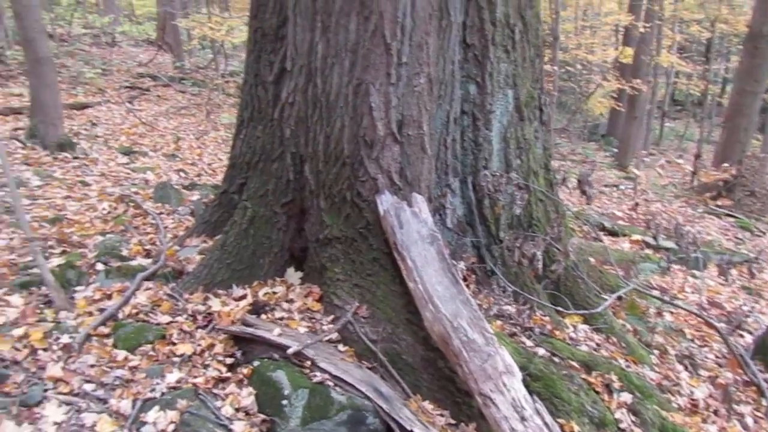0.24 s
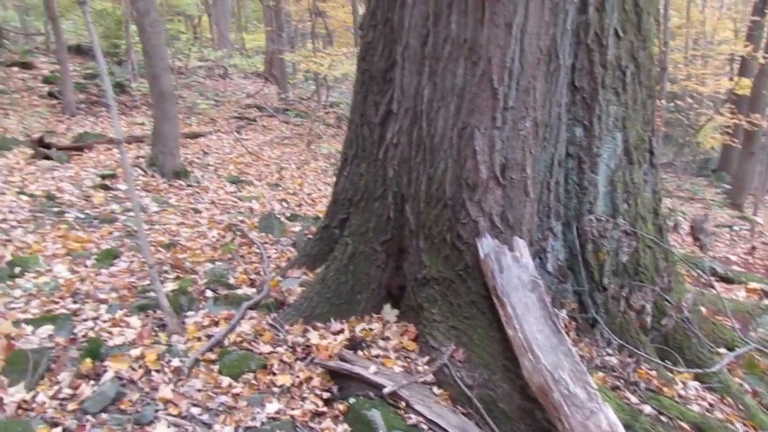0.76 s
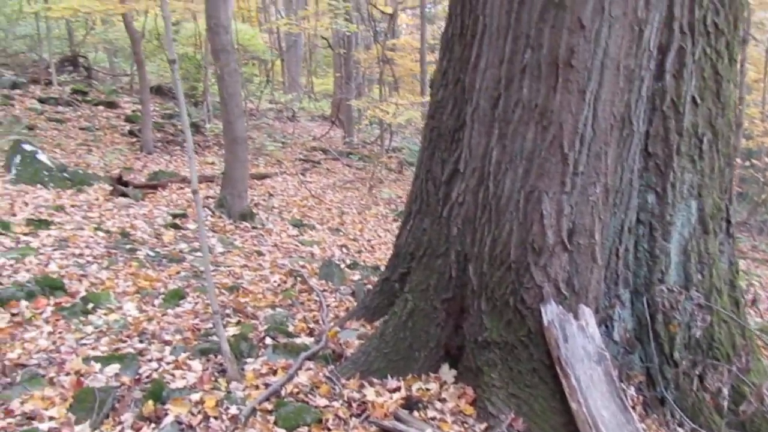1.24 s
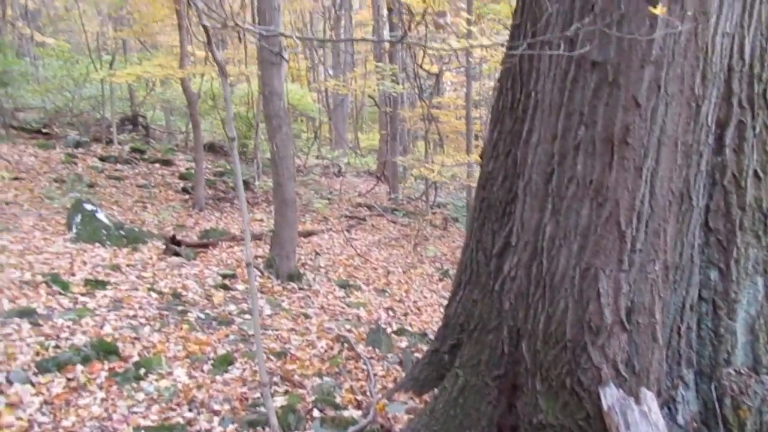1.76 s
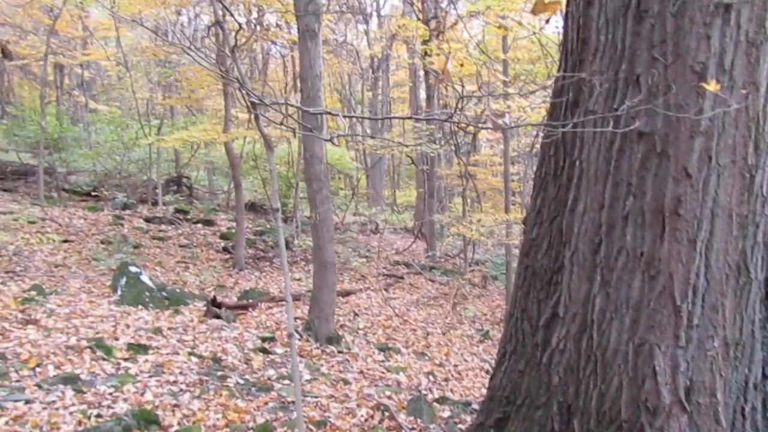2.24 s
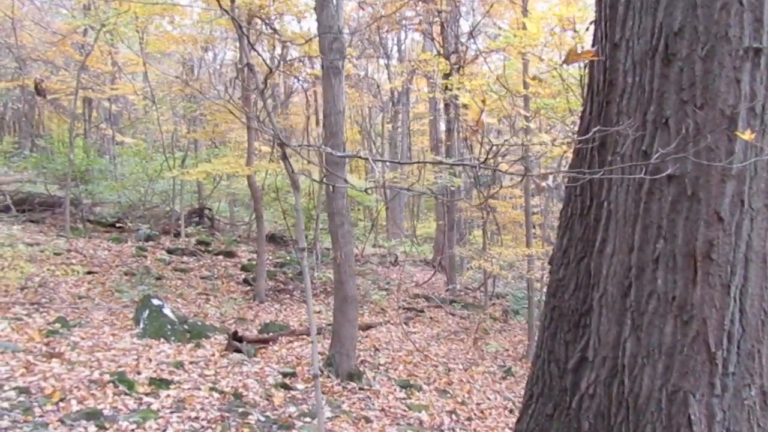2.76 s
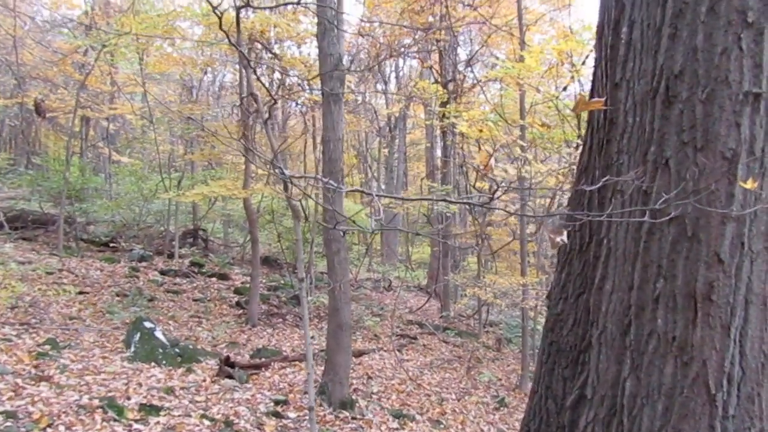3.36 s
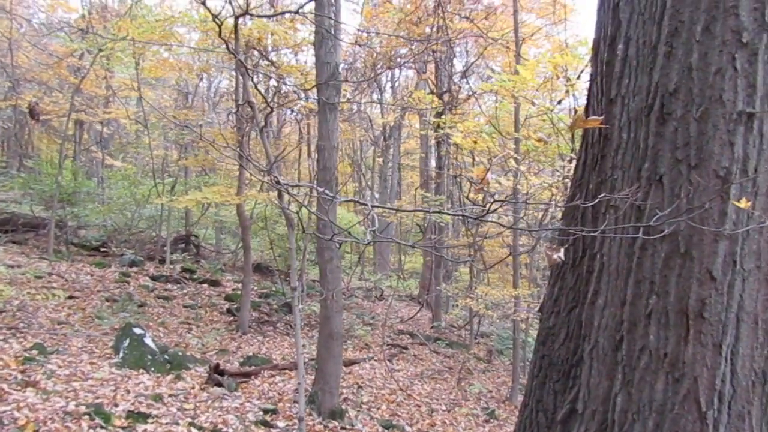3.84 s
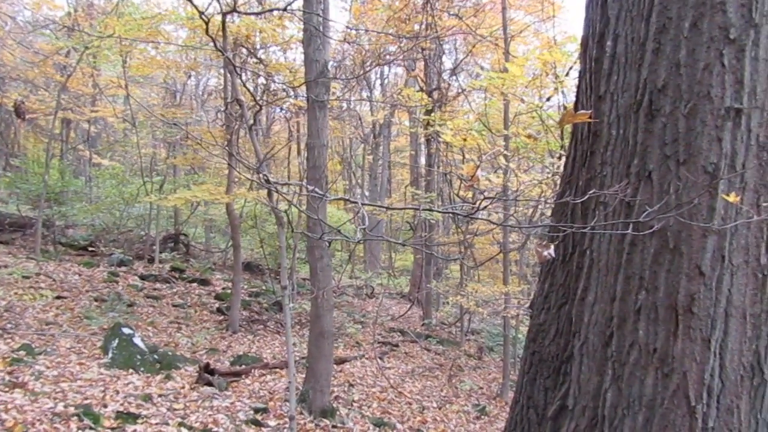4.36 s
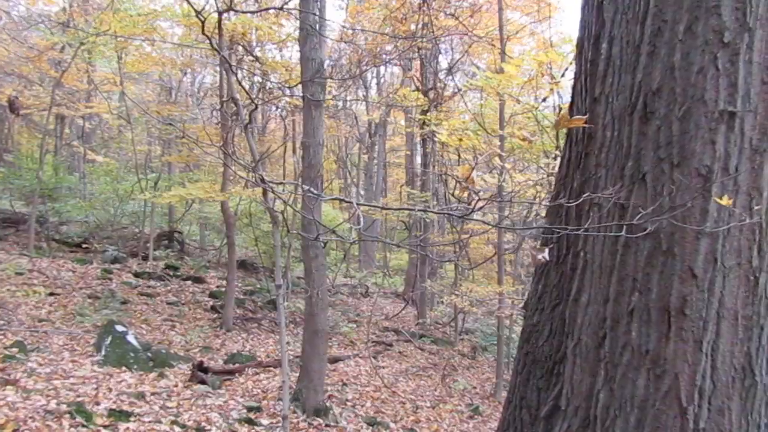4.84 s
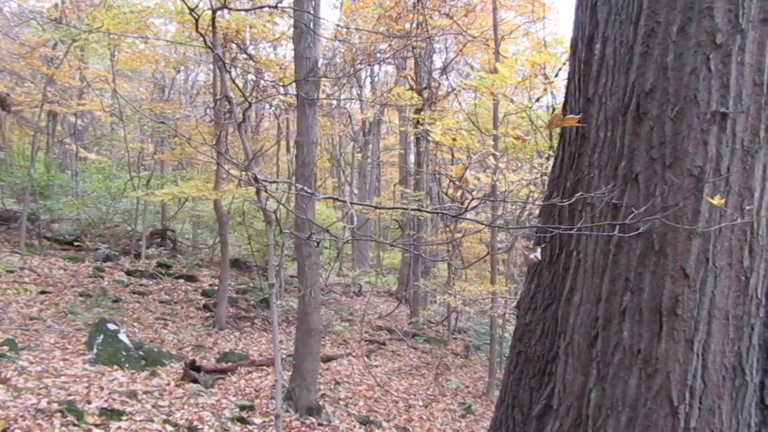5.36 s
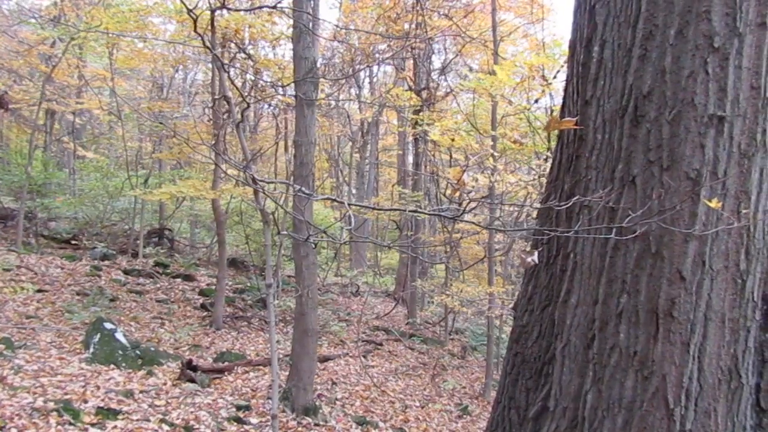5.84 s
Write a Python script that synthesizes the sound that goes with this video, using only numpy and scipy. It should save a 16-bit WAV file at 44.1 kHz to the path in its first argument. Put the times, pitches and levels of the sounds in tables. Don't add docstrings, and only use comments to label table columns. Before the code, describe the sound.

Quiet outdoor air runs throughout: smooth hiss, soft low rumble, a faint distant machine drone around 190 Hz that wavers, and a barely audible thin high electronic whistle. At 0.7 s a tiny, very high bird note is almost hidden. One faint leaf tick comes at 1.9 s. Close dry leaf clicks and small twig knocks cluster at 2.7 and 3.3 s, with lighter ticks at 3.4, 3.9 and 4.1, then denser crackles from 4.3 to 4.65 s. Soft low handling bumps follow from 4.7 s, with a tick at 5.0. At 5.34 s a strong crunch and woody heel thump land; at 5.46 s comes the loudest, sharpest snap, with rustling litter. Smaller snaps occur at 5.7 to 5.9, then a loud crackling break at 6.07 s. Each has a very short woodland echo; the microphone is mono, and its level dips slightly after loud snaps.

```python
import sys
import numpy as np
from scipy import signal
from scipy.fft import rfft, irfft
from scipy.io import wavfile
from scipy.ndimage import uniform_filter1d

SR = 44100
rng = np.random.default_rng(int(sys.argv[2]) if len(sys.argv) > 2 else 0)


def how_loud(loudness_db):
    steps = np.asarray(loudness_db, float) / 20
    return 10 ** steps


def wrap_up_sound(samples):
    columns = np.atleast_2d(samples).T
    tamed = np.clip(columns, -1, 1)
    steps = np.round(tamed * 32767).astype(np.int16)
    wavfile.write(sys.argv[1], SR, steps)


N = 268877

# start_s, peak_db, ring_hz, brittle_db
CRISP_LEAVES = [(1.879, -29, 5660, -10), (2.7103, -21, 2800, -16), (2.7198, -26.5, 6690, 3.5),
                (3.2816, -20, 5600, -9), (3.445, -29, 5000, -7), (3.89, -26, 6160, -6),
                (4.3335, -28, 5000, -12), (4.3614, -21, 4400, -3.5), (4.4035, -25, 5800, -10),
                (4.461, -27, 3560, 0), (4.623, -35, 6000, 3), (4.631, -24, 3460, -10),
                (5.013, -23, 5610, -7), (5.3366, -12.5, 5000, -16), (5.3395, -12, 5800, -9),
                (5.4574, -14, 8000, 0), (5.4708, -30, 5420, -4), (6.071, -26, 4940, -5),
                (6.075, -30, 4390, -8), (6.0774, -19, 4060, -8), (6.0935, -27, 4230, -7)]
# start_s, peak_db, ring_hz, crumble_s
CRUSHED_LITTER = [(2.708, -26, 3750, 0.0024), (2.712, -25.5, 4970, 0.0056), (3.285, -29.5, 6480, 0.0068),
                  (4.125, -27, 3700, .0046), (4.334, -27, 5900, .0072), (4.403, -27, 5860, .0084),
                  (4.642, -31, 6410, .004), (5.3376, -16, 2750, .005), (5.3407, -15.5, 4050, .006),
                  (5.4572, -9.5, 2640, 0.0014), (5.4586, -14.5, 4970, .0045), (5.683, -17, 4760, 0.0025),
                  (5.839, -32, 4130, .002), (5.908, -28.5, 4410, .004), (6.0895, -27, 3740, .001)]
# start_s, peak_db, ring_hz, crumble_s
BREAKING_STALKS = [
    (3.282, -21.5, 5640, 0.002),
    (4.129, -28, 5800, .002),
    (4.6344, -19, 5770, .002),
    (4.635, -29, 3300, 0.0029),
    (5.4576, 1.5, 5250, 0.00023),
    (5.6824, -19.5, 6500, .001),
    (6.0725, -9.5, 4170, 0.0015),
]
# start_s, peak_db, pitch_hz, t60_s (time to fade by 60 dB)
TWIG_KNOCKS = [(2.706, -30.5, 900, .008), (2.7105, -28, 3700, .008), (2.711, -34, 1300, .015),
               (2.7205, -31, 950, .025), (2.722, -35, 1300, .025), (3.2816, -32, 800, .012),
               (3.2817, -24, 3380, .007), (3.282, -30, 1150, .012), (4.3338, -33, 4400, .01),
               (4.361, -30, 1500, .01), (4.362, -35, 500, .012), (4.4043, -29, 3400, .008),
               (4.6347, -26, 3300, .02), (5.338, -30, 760, .022), (5.3398, -18, 6000, .01),
               (5.4562, -20, 2100, .012), (5.4567, -21, 900, .025), (5.4575, -13.5, 2700, .006),
               (5.4576, -16, 2000, .008), (5.4583, -23, 1200, .02), (5.4585, -30, 820, .03),
               (5.462, -26, 1250, .025), (5.4664, -29, 1840, .025), (5.6826, -29, 408, .011),
               (5.6832, -23, 1750, .007), (6.0732, -21.5, 1740, .014), (6.0733, -20, 4400, .008),
               (6.077, -30, 2700, .008)]
# start_s, level_db
HEEL_BLOW = (5.3413, -23)
# pitch_hz, level_db, t60_s
ROOT_MODES = [(194, 0.5, 0.041), (488, 2.5, 0.044), (850, 5.5, 0.02), (1330, 12, 0.0072), (2100, 1, 0.016)]
# start_s, peak_db, t60_s
SETTLING = [
    (3.283, -42, .2),
    (4.127, -43, .18),
    (4.335, -41, 0.64),
    (4.405, -43, .18),
    (4.636, -36, .15),
    (5.341, -29.5, 0.15),
    (5.458, -28.5, 0.081),
    (6.074, -29.5, .07),
]
# start_s, peak_db, t60_s
ROLLING = [
    (2.714, -44, .25),
    (4.465, -47, .25),
    (5.405, -39.5, 0.36),
    (5.43, -42, 0.28),
    (5.53, -42, 0.42),
    (6.092, -44, .3),
]
# middle_s, peak_db, pitch_hz
GRIP_SHIFTS = [(4.72, -41, 190), (4.845, -44, 100), (4.96, -40, 160), (5.09, -50.5, 140), (4.9, -50, 35),
               (4.965, -42.5, 55), (5.095, -41, 40), (5.18, -50, 50), (5.25, -47, 38), (5.335, -44, 35),
               (5.455, -42, 50)]
# pitch_hz, width_hz
MIC_PORT = (4700, 3200)
# start_s, length_s, pitch_hz, level_db
BIRD_NOTE = (.67, .1, 11050, -59)
# pitch_hz, level_db (per Hz)
AIR_COLOUR = [(12, -48), (20, -13), (98, -6.5), (134, -5.5), (187, -4), (328, -9), (367, -8.5), (527, -8.5),
              (607, -7.5), (873, -9), (1710, -12.5), (4060, -10.5), (8180, -16), (11400, -22.5),
              (16000, -41)]
# pitch_hz, width_hz, level_db
HISS_BUMP = (5270, 950, -13.5)
# time_s, level_db
BREEZE = [(0, -1.4), (.9, -.5), (4.9, -.5), (5.3, -1.4), (5.6, -1.4), (6.1, 0.2)]
# pitch_hz, width_hz, level_db
MACHINE = (188.5, 17, -57)
# time_s, level_db
MACHINE_NEARNESS = [(0, -1.5), (2, 3.5), (4, -3), (4.9, 4.5), (5.6, -8), (6.1, -14)]


def rms_one(x):
    return x / np.sqrt(np.mean(x ** 2) + 1e-20)


def peak_one(x):
    return x / np.max(np.abs(x))


def level_over_time(rows):
    time_s, level_db = np.transpose(rows)
    return np.interp(np.arange(N) / SR, time_s, level_db)


def resonate(x, hz, width_hz):
    r = np.exp(-np.pi * width_hz / SR)
    feedback = [1, -2 * r * np.cos(2 * np.pi * hz / SR), r * r]
    return signal.lfilter([(1 - r * r) / 2, 0, (r * r - 1) / 2], feedback, x)


def band(x, low_hz, high_hz):
    edges_hz = [low_hz, min(high_hz, 0.45 * SR)]
    return signal.sosfilt(signal.butter(2, edges_hz, "band", fs=SR, output="sos"), x)


def add(track, start_s, sound):
    at = round(start_s * SR)
    track[at:at + len(sound)] += sound[:N - at]


def one_snap(ring_hz, crumble_s, brittle_db, broad):
    length = 1600
    age = 3.0 * np.arange(length) / SR / crumble_s
    cracks = (rng.random(length) < 0.5) * rng.uniform(-1, 1, length) ** 3
    cracks = cracks * (age + 0.22) * np.exp(-age)

    ring_width_hz = 0.26 * ring_hz
    leaf = resonate(cracks, ring_hz, ring_width_hz)
    leaf = peak_one(resonate(leaf, ring_hz, ring_width_hz))
    port = resonate(cracks, *MIC_PORT) + how_loud(5.0) * cracks
    port = peak_one(band(port, 930, 8400))
    brittle = peak_one(band(band(cracks, 7950, 11900), 6000, 14700))
    return peak_one(leaf + 6.0 * broad * port) + how_loud(brittle_db) * brittle


def snaps():
    out = np.zeros(N)
    for start_s, peak_db, ring_hz, crumble_s in BREAKING_STALKS:
        snap = one_snap(ring_hz, crumble_s, brittle_db=-26, broad=0.2)
        add(out, start_s, how_loud(peak_db) * snap)
    for start_s, peak_db, ring_hz, crumble_s in CRUSHED_LITTER:
        snap = one_snap(ring_hz, crumble_s, brittle_db=-22, broad=0.48)
        add(out, start_s, how_loud(peak_db) * snap)
    for start_s, peak_db, ring_hz, brittle_db in CRISP_LEAVES:
        snap = one_snap(ring_hz, 0.0017, brittle_db, broad=0.48)
        add(out, start_s, how_loud(peak_db) * snap)
    return out


def knocks():
    out = np.zeros(N)
    t = np.arange(SR // 10) / SR
    for start_s, peak_db, hz, t60_s in TWIG_KNOCKS:
        fade = how_loud(-60 * t / t60_s)
        soft_start = 1 - np.exp(-t * hz * 4.2)
        knock = peak_one(fade * soft_start * np.sin(2 * np.pi * hz * t))
        add(out, start_s, how_loud(peak_db) * knock)
    return out


def heel():
    out = np.zeros(N)
    t = np.arange(SR // 4) / SR
    start_s, level_db = HEEL_BLOW
    ring = np.zeros(len(t))
    for hz, mode_db, t60_s in ROOT_MODES:
        ring += how_loud(mode_db - 60 * t / t60_s) * np.sin(2 * np.pi * hz * t)
    add(out, start_s, how_loud(level_db) * band(ring, 110, 6000))
    return out


def woods(near):
    t60_s, level_db, gap_s = 0.09, -45, 0.004
    t = np.arange(SR // 2) / SR
    tail = band(rng.standard_normal(len(t)), 620, 9300)
    tail = tail * how_loud(-60 * t / t60_s) * (t > gap_s)
    return how_loud(level_db) * signal.fftconvolve(near, tail)[:N]


def rustle():
    cracks_per_s = 12000
    sizes = how_loud(2.0 * np.minimum(rng.exponential(1, N), 4)) * rng.choice([-1, 1], N)
    grains = sizes * (rng.random(N) < cracks_per_s / SR)
    through_port = band(resonate(grains, *MIC_PORT), 1400, 14000)
    texture = rms_one(through_port + how_loud(8) * band(grains, 940, 7700))

    t = np.arange(N) / SR
    loudness = np.zeros(N)
    for rows, rise_db_per_s in [(SETTLING, 6000), (ROLLING, 300)]:
        for start_s, peak_db, t60_s in rows:
            rise_db = rise_db_per_s * (start_s - t)
            fade_db = 60 * (t - start_s) / t60_s
            loudness += how_loud(peak_db - np.maximum(rise_db, fade_db))
    return texture * loudness


def handling():
    out = np.zeros(N)
    for middle_s, peak_db, hz in GRIP_SHIFTS:
        cycles = np.arange(round(1.5 * SR / hz)) * hz / SR
        push = np.hanning(len(cycles)) * np.sin(2 * np.pi * cycles)
        add(out, middle_s - 0.73 / hz, how_loud(peak_db) * push)
    return out


def chirp():
    out = np.zeros(N)
    start_s, length_s, hz, level_db = BIRD_NOTE
    t = np.arange(round(length_s * SR)) / SR
    swell = np.sin(np.pi * t / length_s)
    waver = 3 * np.sin(2 * np.pi * 14 * t)
    add(out, start_s, how_loud(level_db) * swell * np.sin(2 * np.pi * hz * t + waver))
    return out


def whistle():
    hz, level_db = 11794, -70
    wander = 0.02 * np.cumsum(rng.standard_normal(N))
    tone = np.sqrt(2) * np.sin(2 * np.pi * hz * np.arange(N) / SR + wander)
    return how_loud(level_db) * tone


def machine():
    hz, width_hz, level_db = MACHINE
    drone = rms_one(resonate(rng.standard_normal(N), hz, width_hz))
    return how_loud(level_db) * drone * how_loud(level_over_time(MACHINE_NEARNESS))


def air():
    level_db = -40.5
    hz = np.arange(1, N // 2 + 2) * SR / N
    colour_hz, colour_db = np.transpose(AIR_COLOUR)
    colour = how_loud(np.interp(np.log(hz), np.log(colour_hz), colour_db))
    spectrum = rfft(rng.standard_normal(N)) * colour
    low_share = 1 / (1 + (hz / 1300) ** 2)
    rumble = irfft(spectrum * low_share, N)
    hiss = irfft(spectrum * (1 - low_share), N)

    bump_hz, bump_width_hz, bump_db = HISS_BUMP
    hiss = hiss + how_loud(bump_db) * resonate(hiss, bump_hz, bump_width_hz)
    scale = how_loud(level_db) / np.std(rumble + hiss)
    breeze_db = level_over_time(BREEZE)
    return scale * (rumble * how_loud(0.67 * breeze_db) + hiss * how_loud(breeze_db))


def scene():
    near = snaps() + knocks() + heel()
    mono = near + woods(near) + rustle() + handling() + chirp() + whistle() + machine() + air()
    return np.array([mono, mono])


def band_limit(x):
    return signal.sosfilt(signal.butter(12, 15800, fs=SR, output="sos"), x)


def record(dry):
    duck_from_db, duck_ratio = -28.5, 0.23
    recover_db_per_s, smooth_s = 1.0, 0.059
    power = uniform_filter1d(dry[0] ** 2, size=441)
    over_db = np.maximum(10 * np.log10(power + 1e-12) - duck_from_db, 0)

    creep_db = recover_db_per_s * np.arange(N) / SR
    duck_db = np.maximum.accumulate(duck_ratio * over_db + creep_db) - creep_db
    r = np.exp(-1 / (smooth_s * SR))
    duck_db = signal.lfilter([1 - r], [1, -r], np.maximum(duck_db, 0))
    mix = np.clip(dry * how_loud(-duck_db), -1, 1)
    return band_limit(mix)


dry = scene()
out = record(dry)
wrap_up_sound(out)
```